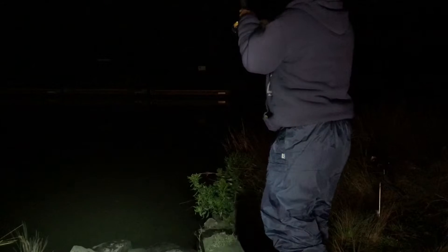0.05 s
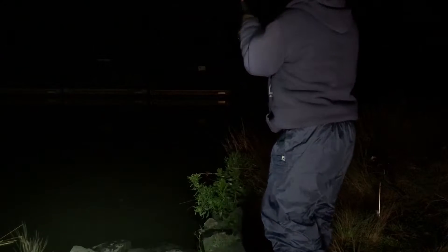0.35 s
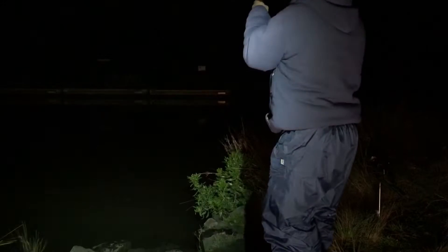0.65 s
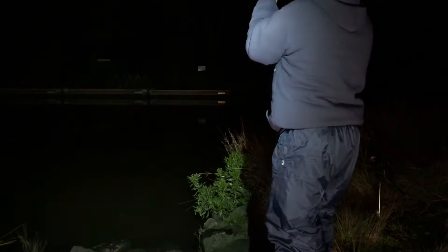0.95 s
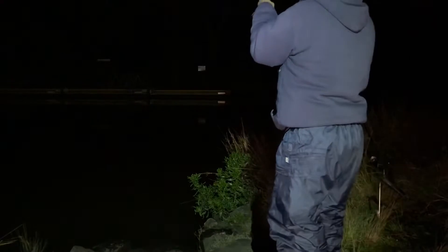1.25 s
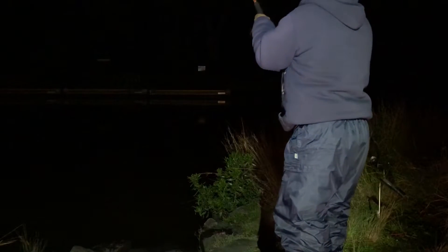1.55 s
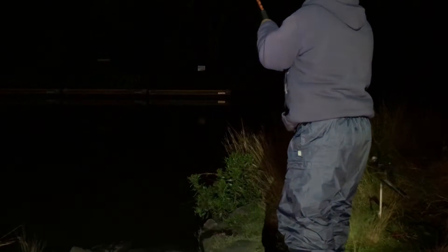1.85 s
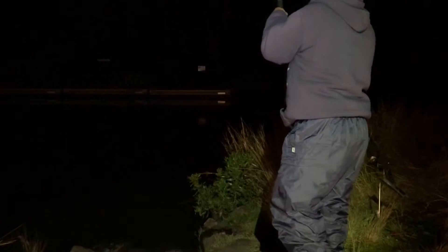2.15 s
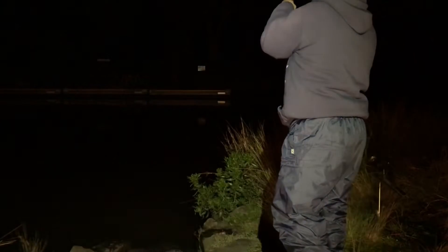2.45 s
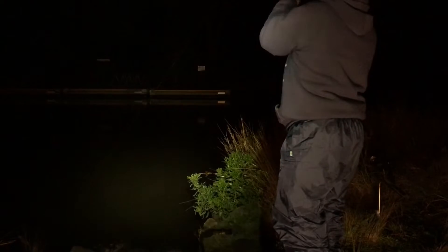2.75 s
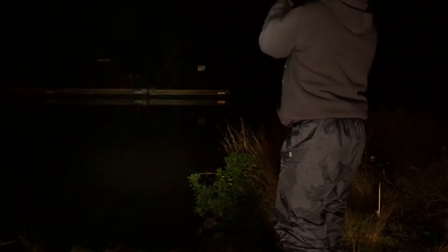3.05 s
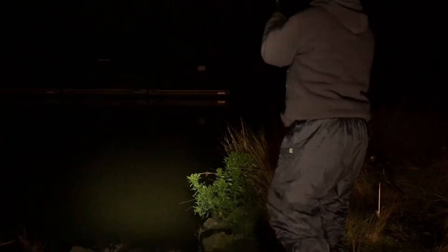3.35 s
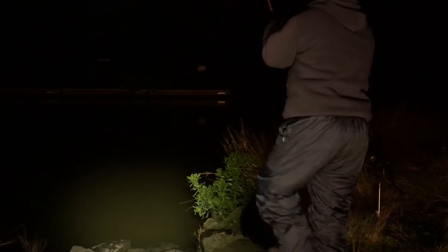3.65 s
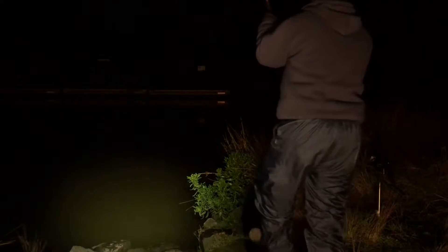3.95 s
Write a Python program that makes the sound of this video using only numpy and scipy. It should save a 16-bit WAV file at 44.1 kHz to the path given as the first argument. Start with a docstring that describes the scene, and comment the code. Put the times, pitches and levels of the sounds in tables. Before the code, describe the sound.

A small metal bell jingles on a fishing rod in quick, high, uneven strikes, with light clacks from its mount. It nearly stops around 0.9 seconds, returns with its loudest strike at 1.3 and rattles busily until 2. The jingling thins and softens, then picks up from about 2.9 to 4 seconds with more clacks and a faint buzz. Low, steady wind rumbles underneath throughout.

```python
"""Bell on a fishing rod at night

A small slotted metal bell jingles on a moving rod beside water. Its pellet strikes the shell, exciting
three groups of damped modes, and rattles on between the strikes. The mount clacks and buzzes against
the rod. The ground returns one quick echo; a faint swish, low wind and a far wash lie underneath."""
import sys
import numpy as np
from scipy import signal
from scipy.fft import rfft, irfft
from scipy.io import wavfile
from scipy.ndimage import uniform_filter1d

SR = 44100
rng = np.random.default_rng(int(sys.argv[2]) if len(sys.argv) > 2 else 0)


def transcribe(signal):
    """Save signal, clipped to [-1, 1], as a 16-bit WAV file at the path in sys.argv[1]."""
    frames = np.atleast_2d(signal).T
    limited = np.clip(frames, -1, 1)
    pcm = np.round(limited * 32767).astype(np.int16)
    wavfile.write(sys.argv[1], SR, pcm)


N = 176400

# Pellet impacts (time [s], relative level [dB], pitch [Hz], second ring gain [dB], third ring gain [dB])
IMPACTS = [(0.0773, -29, 4560, -14.5, -19), (0.0918, -34, 4580, -28, -14), (0.158, -34.5, 4490, -20, -22),
           (0.1721, -22.5, 4510, -21, -22), (0.2248, -28, 4480, -27, -17), (0.2276, -23, 4490, -32, -29),
           (0.3062, -38, 4570, -29, -38), (0.3187, -36, 4530, -29, -27), (0.3864, -24, 4430, -1.5, -12),
           (0.401, -29, 4450, -38, -35), (0.4564, -28, 4520, -17, -29), (0.4968, -26.5, 4530, -39, -35),
           (0.5227, -26, 4540, -40, -20), (0.5533, -27.5, 4540, -14.5, -17),
           (0.6423, -30.5, 4570, -14, -24), (0.6746, -24, 4540, -21, -33), (0.6942, -27, 4520, -38, -37),
           (0.727, -31, 4520, -37, -35), (0.8446, -35, 4580, -16.5, -37), (1.1224, -47.5, 4620, -24, -30),
           (1.237, -36, 4660, -11, -37), (1.3063, -13.5, 4510, -23, -33), (1.4536, -32, 4540, -34, -40),
           (1.511, -24.5, 4470, -25, -38), (1.5324, -25, 4480, -13.5, -36), (1.587, -21.5, 4510, -35, -39),
           (1.6001, -16, 4540, -20.5, -36), (1.6696, -28, 4550, -18, -37),
           (1.7176, -19.5, 4470, -15.5, -26), (1.7347, -19.5, 4490, -29, -37),
           (1.8027, -32, 4600, -33, -13), (1.8487, -27.5, 4510, -8.5, -32), (1.8592, -30, 4510, -14, -31),
           (1.9704, -23, 4540, -27, -41), (2.094, -41, 4540, -13, -32), (2.1271, -30, 4630, -26, -31),
           (2.1496, -32, 4630, -21, -17), (2.1919, -35.5, 4530, -33, -32), (2.284, -36.5, 4460, -18, -32),
           (2.3222, -33.5, 4480, -16, -27), (2.4029, -47, 4490, -20, -40), (2.4504, -44, 4540, -10, -36),
           (2.469, -35.5, 4580, -20, -36), (2.5712, -42.5, 4530, -18, -31), (2.635, -51, 4590, -10, -30),
           (2.6507, -30, 4580, -24, -37), (2.7132, -44, 4590, -19, -15), (2.7934, -34, 4550, -23, -35),
           (2.833, -37, 4520, -21, -20), (2.8774, -29.5, 4510, -32, -29), (2.8966, -21.5, 4490, -28, -41),
           (2.9596, -22, 4620, -24, -40), (2.9713, -45, 4660, -18, -26), (3.004, -27, 4510, -25, -28),
           (3.0643, -23.5, 4510, -31, -19), (3.1022, -25.5, 4510, -20.5, -34),
           (3.1402, -34.5, 4560, -13, -32), (3.1626, -27, 4530, -14.5, -43),
           (3.1863, -29.5, 4560, -15, -23), (3.205, -30.5, 4460, -8.5, -9), (3.246, -32.5, 4530, -19, -15),
           (3.2819, -29.5, 4580, -32, -29), (3.315, -29.5, 4650, -38, -33), (3.3228, -32.5, 4530, -35, -42),
           (3.3767, -25.5, 4450, -20, -28), (3.3854, -24.5, 4480, -30, -18), (3.5205, -23, 4540, -22, -22),
           (3.5923, -28.5, 4640, -34, -20), (3.633, -30.5, 4500, -8.5, -22),
           (3.6561, -27.5, 4570, -29, -20), (3.6899, -25, 4590, -12.5, -30), (3.7057, -30, 4490, -33, -32),
           (3.7628, -26.5, 4520, -15, -14), (3.7936, -35, 4590, -28, -17), (3.8259, -27.5, 4470, -18, -23),
           (3.904, -31.5, 4500, -33, -36), (3.919, -22, 4500, -21, -32), (3.9442, -29, 4470, -26, -18),
           (3.9886, -26.5, 4570, -14, -28)]
def strikes(gain_db=-2, rebounds=3, rebound_s=.0045, rebound_db=-5.5, spread_hz=70):
    """Inelastic collision: each jerk throws the pellet at the shell, and it rebounds ever more weakly."""
    out = np.zeros(N)
    for s, db, hz, *upper_db in IMPACTS:
        add(out, s, amp(db + gain_db) * ping(hz, *upper_db))
        for k, (jitter, detune) in enumerate(rng.uniform(-1, 1, (rebounds, 2)), start=1):
            s += rebound_s * (1 + .5 * jitter)
            add(out, s, amp(db + gain_db + rebound_db * k) * ping(hz + spread_hz * detune, *upper_db))
    return out


# Three groups of shell modes at the nominal pitch (frequency [Hz], relative level [dB], T60 [s])
FIRST_MODES = [(4506, 0.5, 0.061), (4569, -11, 0.025), (4500, -70, 0.058), (4730, -13, 0.075),
               (5170, -28, 0.068)]
SECOND_MODES = [(8725, -6, .062), (8955, -3, .062)]
THIRD_MODES = [(12390, -4, .058), (12590, -3, .058)]
NOMINAL_HZ = 4510
def ping(hz, second_db, third_db, tick_db=-21.5, tick_s=.0029):
    """Impulse response: one contact excites all three mode groups and a faint tick of noise."""
    bend = hz / NOMINAL_HZ
    upper_bend = bend ** .096  # the upper modes barely follow the pitch
    tone = ring(FIRST_MODES, bend)
    tone += amp(second_db) * ring(SECOND_MODES, upper_bend)
    tone += amp(third_db) * ring(THIRD_MODES, upper_bend)
    t = np.arange(len(tone)) / SR
    return tone + amp(tick_db) * np.exp(-t / tick_s) * rng.standard_normal(len(t))


def ring(modes, bend, spread_db=3, contact_s=.00024, size=3200):
    """Modal superposition: damped sinusoids add, weighted at random by where the pellet lands."""
    t = np.arange(size) / SR
    spot = rng.standard_normal(len(modes))
    tone = sum(amp(db + spread_db * weight - 60 * t / t60) * np.sin(2 * np.pi * hz * bend * t)
               for (hz, db, t60), weight in zip(modes, spot - spot.mean()))
    return tone * (1 - np.exp(-t / contact_s))


# Strength of the rattle (time [s], relative level [dB])
RATTLE_LEVEL = [(0, -41.5), (0.09, -46.5), (0.13, -44), (0.2, -60), (0.27, -47), (0.35, -37), (0.44, -47.7),
                (0.52, -42), (0.6, -53), (0.66, -44.5), (0.73, -47), (0.79, -69), (0.93, -56), (1.08, -75),
                (1.17, -65), (1.22, -45.5), (1.29, -48), (1.35, -41), (1.4, -50.9), (1.46, -32), (1.5, -64),
                (1.56, -46), (1.65, -50.5), (1.74, -37), (1.82, -58), (1.88, -38.5), (1.94, -56),
                (2.04, -39), (2.09, -57.5), (2.2, -45.5), (2.26, -63), (2.31, -46.5), (2.39, -71),
                (2.55, -68), (2.68, -53.5), (2.77, -87), (2.85, -50), (2.92, -46.5), (3.03, -39.5),
                (3.13, -47), (3.22, -47), (3.4, -39.5), (3.66, -39.5), (3.84, -43), (3.88, -46),
                (3.93, -44.5), (4, -49)]
# Coupling to each mode group (gain [dB], spread between touches [dB], exponent on the level swing [-])
COUPLING = [(-2, 3.5, 0.99), (-23, 6.5, 0.74), (-28, 7, 0.68)]
def rattle(per_s=340, centre_hz=4537, spread_hz=115, usual_db=-42, pitches=24, touches=2600):
    """Random excitation: small, uneven touches of the skipping pellet keep the shell ringing."""
    out = np.zeros(N)
    times = np.cumsum(2 * rng.random(touches)) / per_s
    swing = level(RATTLE_LEVEL, times) / amp(usual_db)
    bends = (centre_hz + spread_hz * np.linspace(-1, 1, pitches)) / NOMINAL_HZ
    groups = (FIRST_MODES, 1), (SECOND_MODES, .3), (THIRD_MODES, .3)
    for (modes, pitch_follow), (db, spread_db, exponent) in zip(groups, COUPLING):
        rings = [ring(modes, bend ** pitch_follow) for bend in bends]
        gains = swing ** exponent * amp(usual_db + db) * uneven(spread_db, touches)
        for s, gain, k in zip(times, gains, rng.integers(0, pitches, touches)):
            add(out, s, gain * rings[k])
    return out


# Impacts of the mount on the rod (time [s], relative level [dB])
MOUNT_IMPACTS = [(0.2057, -43), (0.219, -37.5), (0.2746, -39), (0.3222, -37), (0.4652, -35.5),
                 (1.3315, -41), (1.4097, -39.5), (1.6023, -36), (1.7613, -44.5), (2.0426, -38),
                 (2.9487, -35.5), (3.003, -34.5), (3.0581, -33), (3.231, -34.5), (3.3669, -34.5),
                 (3.5697, -35.5), (3.6815, -33.5), (3.755, -33), (3.924, -40)]
def clacks(gain_db=-5, rise_s=.00052, t60_s=.023, tail_db=-4.5, tail_t60_s=.085, size=4096):
    """Impact noise: each clack is a burst with its own colour, trailing into chatter."""
    t, out = np.arange(size) / SR, np.zeros(N)
    decay = amp(-60 * t / t60_s) + amp(tail_db - 60 * t / tail_t60_s)
    envelope = (1 - np.exp(-t / rise_s)) * decay
    for s, db in MOUNT_IMPACTS:
        grain = amp(3.5 * drift(size, width=60))  # roughness in time
        tint = amp(2.5 * drift(size // 2 + 1, width=50))  # ripple in the spectrum
        noise = irfft(tint * rfft(rng.standard_normal(size)))
        add(out, s, amp(db + gain_db) * envelope * unit(grain * noise))
    return out


# Strength of the mount's buzz (time [s], relative level [dB])
BUZZ_LEVEL = [(0, -69.5), (0.13, -68), (0.35, -70), (0.55, -68.2), (0.61, -70), (0.7, -81), (0.8, -78.5),
              (1.18, -85), (1.45, -70), (1.56, -97), (1.73, -62), (1.94, -75), (2.04, -87), (2.12, -82),
              (2.32, -73), (2.42, -80), (2.8, -80), (2.92, -88), (3.13, -79), (3.22, -69), (3.4, -66),
              (3.74, -61), (3.89, -68), (4, -62)]
def buzz(gain_db=3.5, per_s=1100, spread_db=4):
    """Shot noise: the loose mount's tiny random contacts merge into a light buzz."""
    contacts = rng.random(N) < per_s / SR
    ticks = contacts * uneven(spread_db, N) * rng.choice([-1, 1], N)
    return amp(gain_db) * level(BUZZ_LEVEL, np.arange(N) / SR) * unit(ticks)


# Frequency response of the mount (frequency [Hz], relative gain [dB])
MOUNT_RESPONSE = [(300, -27), (1500, -7), (2300, -0.5), (2600, -5), (2950, 2.5), (3400, -5), (4200, 3.5),
                  (5900, 2.5), (7300, -1), (8200, -2.5), (10500, -3.5), (12000, -7.5), (14000, -9.5),
                  (15500, -8.5)]
def mount(size=1024):
    """Source and filter: a minimum-phase response of unit energy colours the clacks and the buzz."""
    hz = abs(np.fft.fftfreq(size, 1 / SR))
    log_gain = np.log(amp(spectrum_db(MOUNT_RESPONSE, hz)))
    taps = np.fft.ifft(np.exp(np.conj(signal.hilbert(log_gain)))).real[:size // 2]
    return signal.oaconvolve(clacks() + buzz(), taps / np.linalg.norm(taps))[:N]


def bank(x, echo_s=.004, echo_db=-15.5, top_hz=7150, scatter_db=-18.5, t60_s=.21, size=12000):
    """Reflection and scattering: one dulled echo from the ground, a thin tail from stones and plants."""
    t, echo = np.arange(size) / SR, np.zeros(N)
    add(echo, echo_s, signal.lfilter(*signal.butter(1, top_hz, fs=SR), x))
    tail = rng.standard_normal(size) * amp(-60 * t / t60_s) * (t > echo_s)
    scatter = signal.oaconvolve(x, tail / np.linalg.norm(tail))[:N]
    return x + amp(echo_db) * echo + amp(scatter_db) * scatter


def swish(peak_s=2.58, sigma_s=.08, centre_hz=6400, width_hz=1000, db=-71.5):
    """Narrow-band noise: a faint hiss swells and fades in a lull of the bell."""
    detuning = 2 * (np.fft.rfftfreq(N, 1 / SR) - centre_hz) / width_hz
    band = irfft(rfft(rng.standard_normal(N)) / (1 + detuning ** 2), N)
    return amp(db) * unit(band) * np.exp(-.5 * ((np.arange(N) / SR - peak_s) / sigma_s) ** 2)


# Spectrum of the wind and far wash (frequency [Hz], relative spectral density [dB])
WIND_SPECTRUM = [(20, -44), (30, -51), (46, -1), (68, -0.5), (125, -2), (190, -10.5), (260, -12),
                 (420, -16), (800, -14), (1200, -18.5), (1800, -27), (2600, -37), (3600, -45.5),
                 (7000, -60), (12000, -66), (16000, -76)]
def wind(db=-41, patch_db=1, gust_db=.05, size=4096):
    """Spectrally shaped noise: a nearly steady rumble and far wash, with slowly drifting patches."""
    hz, hop = np.fft.rfftfreq(size, 1 / SR), size // 4
    frames = N // hop + 5
    real, imag, patches = rng.standard_normal((frames, len(hz), 3)).T
    patches = uniform_filter1d(patches, size=30, axis=0)  # smooth over frequency
    patches = unit(uniform_filter1d(patches, size=4, axis=1))  # and over time
    gusts = drift(frames, width=16)
    gain = amp(spectrum_db(WIND_SPECTRUM, hz)[:, None] + patch_db * patches + gust_db * gusts)
    _, air = signal.istft((real + 1j * imag) * gain, nperseg=size, noverlap=size - hop)
    return amp(db) * unit(air[:N])


def amp(db):
    """Decibels to amplitude ratio."""
    return 10 ** (np.asarray(db) / 20)


def unit(x):
    """Normalisation to rms 1."""
    return x / np.sqrt(np.mean(x ** 2) + 1e-20)


def drift(size, width):
    """Moving average of white noise, at rms 1."""
    return unit(uniform_filter1d(rng.standard_normal(size), size=width))


def uneven(spread_db, size):
    """Log-normal gains, limited to two standard deviations."""
    return amp(spread_db * np.clip(rng.standard_normal(size), -2, 2))


def spectrum_db(points, hz):
    """Interpolation on a log-frequency axis."""
    f, db = np.transpose(points)
    return np.interp(np.log(hz + 1), np.log(f + 1), db)


def level(curve, s):
    """Amplitude envelope of a decibel curve at the times s."""
    return amp(np.interp(s, *np.transpose(curve)))


def add(mix, s, sound):
    """Superposition of a sound from time s."""
    part = mix[max(round(s * SR), 0):][:len(sound)]
    part += sound[:len(part)]


def scene(radiate_hz=4050):
    """Radiation efficiency: the small shell sheds no low notes; bell and mount sound over the wind."""
    radiation = signal.butter(5, radiate_hz, "high", fs=SR, output="sos")
    bell = signal.sosfilt(radiation, strikes() + rattle())
    return (bank(bell + mount()) + swish() + wind())[None]


def record(dry, edge_hz=15830):
    """Band limiting: a steep low-pass removes the highest treble."""
    taps = signal.firwin(511, edge_hz, window=("kaiser", 9), fs=SR)
    return signal.oaconvolve(dry, taps[None], "same")


dry = scene()
out = record(dry)
transcribe(out)
```